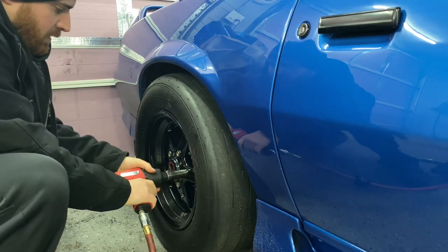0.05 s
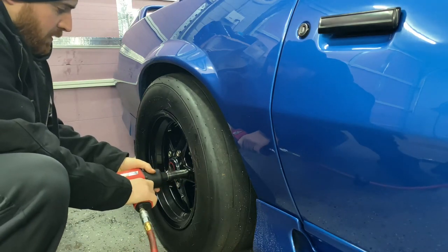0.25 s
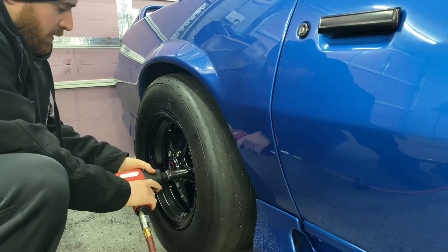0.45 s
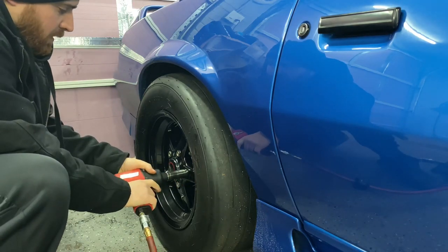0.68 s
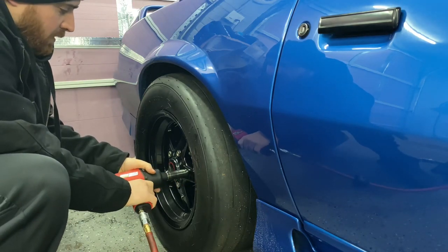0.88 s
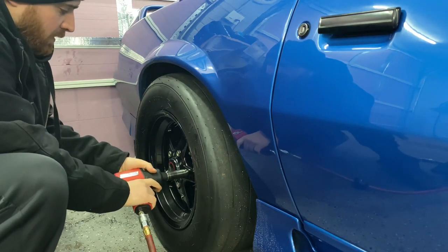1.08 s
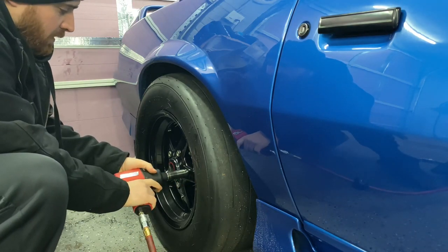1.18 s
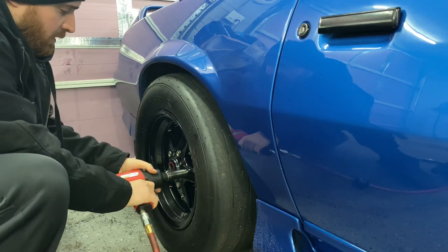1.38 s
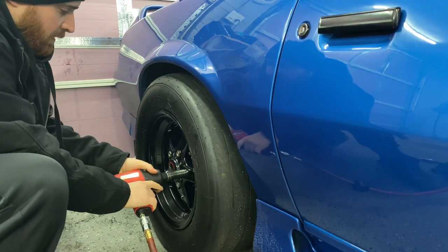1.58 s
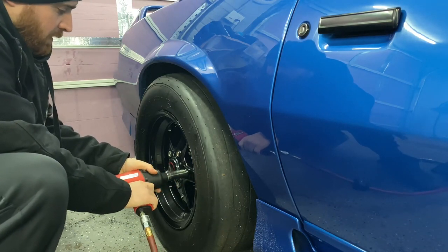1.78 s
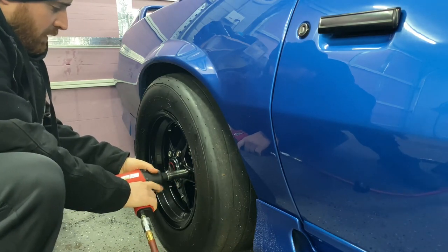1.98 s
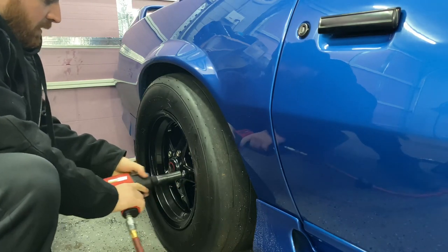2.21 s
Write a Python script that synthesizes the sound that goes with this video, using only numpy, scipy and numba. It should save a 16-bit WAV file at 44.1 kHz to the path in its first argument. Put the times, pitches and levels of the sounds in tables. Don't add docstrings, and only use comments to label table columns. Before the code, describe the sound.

A close air impact wrench is triggered four times on a wheel nut: a rising airy whirr first, then hissing bursts with sharp steel blows, small rattles between, short wall echoes and faint compressor hum, caught by phone.

```python
import sys
import numpy as np
from scipy import signal
from scipy.fft import rfft, irfft
from scipy.io import wavfile
from scipy.ndimage import uniform_filter1d, map_coordinates
from numba import njit

SR = 44100
rng = np.random.default_rng(int(sys.argv[2]) if len(sys.argv) > 2 else 0)


def undo_db(level):
    steps = np.asarray(level, float) / 20
    return 10 ** steps


def dump_mix(stems):
    frames = np.atleast_2d(stems).T
    limited = np.clip(frames, -1, 1)
    pcm = np.round(limited * 32767).astype(np.int16)
    wavfile.write(sys.argv[1], SR, pcm)


N = 99225

# frequency in Hz, level in dB.
AIR_SPECTRUM = [(150, -17), (300, -3.5), (1350, -10), (2250, -9), (4750, -6), (8000, -12), (10500, -9.5),
                (14500, -14.5)]
# frequency in Hz, level in dB.
RATTLE_SPECTRUM = [(150, -11.5), (500, 4.5), (700, -1.5), (900, 2.5), (1200, -5.5), (1700, -3.5),
                   (1900, -12), (9000, -32)]


def curve(rows, col, edge):
    r = np.array(rows, float)
    return np.interp(np.arange(N) / SR, r[:, 0], r[:, col], edge, edge)


def unit(x):
    return x / np.sqrt(np.mean(x ** 2))


def shape(x, table, low_db):
    f, r = np.fft.rfftfreq(N, 1 / SR) + 1, np.array(table, float)
    gain_db = np.interp(np.log(f), np.log(r[:, 0]), r[:, 1], low_db)
    return irfft(rfft(x) * undo_db(gain_db), N)


def colour(x, table):
    return unit(shape(x, table, -77))


def walk(rate):
    k = int(SR / rate)
    return unit(uniform_filter1d(uniform_filter1d(rng.standard_normal(N), k), k))


def wide():
    same_hz = 500
    mid, side = rng.standard_normal((2, N))
    f = np.fft.rfftfreq(N, 1 / SR)
    side = irfft(rfft(side) * f / np.hypot(f, same_hz), N)
    return np.array([mid + side, mid - side])


def motor():
    # time in seconds, vane rate in Hz, chuff level in dB.
    pull_1 = [(.233, 96, -32), (.24, 98, -19), (.262, 130, -19), (.278, 320, -21), (.296, 400, -22),
              (.325, 555, -23.5), (.357, 605, -23.5), (.403, 420, -24), (.46, 225, -38), (.52, 160, -60)]
    pull_2 = [(.8, 130, -45), (.809, 135, -17), (.822, 160, -18), (.845, 290, -27), (.885, 415, -29),
              (.915, 430, -28), (.93, 330, -34), (.97, 390, -37), (1.05, 375, -50)]
    pull_3 = [(1.303, 92.9, -33), (1.331, 153.5, -19), (1.34, 116.4, -33.5), (1.37, 157.2, -16),
              (1.382, 120, -35), (1.414, 143.2, -24.5), (1.429, 95.06, -32.5), (1.5, 78.76, -33.5),
              (1.542, 97.96, -45)]
    pull_4 = [(1.785, 80.7, -47), (1.805, 104.9, -26), (1.834, 89.9, -40), (1.858, 107.7, -27.5),
              (1.873, 92.2, -35.5), (1.895, 86.56, -29), (1.952, 95.3, -30), (2.001, 82.4, -38),
              (2.041, 94.4, -61)]
    # frequency in Hz, level in dB.
    exhaust = [(50, 8), (120, 8), (220, -6), (350, -2), (560, -6), (850, 3), (1700, -1), (2300, 4)]
    jitter, shimmer_db, order_db = .022, 3, 2.2
    rumble_db, rumble_hz = 6, 138

    pulls = pull_1, pull_2, pull_3, pull_4
    hz = sum(curve(p, 1, 0) for p in pulls) * (1 + jitter * walk(117.8))
    phase = 2 * np.pi * np.cumsum(hz) / SR
    gain = uniform_filter1d(sum(undo_db(curve(p, 2, -200)) for p in pulls), size=300)

    r = np.array(exhaust, float)
    chuff = 0
    for k in range(1, 11):
        port_db = np.interp(np.log(k * hz + 1), np.log(r[:, 0]), r[:, 1])
        level = undo_db(port_db + shimmer_db * walk(78) - order_db * k)
        chuff = chuff + level * np.cos(k * phase - 0.716 * k * k)

    rumble = colour(wide(), [(35, -30), (65, -6), (rumble_hz, 0), (260, -11), (600, -26), (2000, -60)])
    slow = 1 / (1 + (hz / 220) ** 4)
    return gain * (chuff + undo_db(rumble_db) * rumble * slow) + booms(), phase


def booms():
    # start in seconds, peak level in dB, frequency in Hz.
    openings = [
        (.237, -23, 100),
        (.803, -20, 141.2),
        (1.309, -17, 120),
        (1.792, -20, 98),
    ]
    rise_s, fall_s = 0.067, 0.037
    out = 0
    for s, db, hz in openings:
        t = np.maximum(np.arange(N) / SR - s, 0)
        swell = (1 - np.exp(-t / rise_s)) * np.exp(-t / fall_s)
        tone = np.sin(2 * np.pi * hz * t) + 0.34 * np.sin(np.pi * hz * t)
        out = out + undo_db(db + 7.5) * swell * tone
    return out


def hiss(phase):
    # time in seconds, hiss level in dB.
    air_flow = [
        [(.214, -56), (.226, -33.5), (.232, -15), (.266, -15), (.284, -16), (.32, -22.5), (.345, -16.5),
         (.395, -25.5), (.5, -44.5), (.77, -52.5)],
        [(.783, -53), (.787, -23.5), (.797, -11), (.82, -16.5), (.882, -20), (.918, -20), (.924, -27.5),
         (1.05, -36), (1.28, -51)],
        [(1.284, -48.5), (1.302, -22), (1.318, -16), (1.34, -21), (1.46, -20.5), (1.518, -29.5), (1.6, -35.5),
         (1.755, -56.5)],
        [(1.765, -49), (1.773, -40), (1.786, -26), (1.803, -20), (1.824, -20.5), (1.95, -21.5), (1.975, -25),
         (2.096, -40.5), (2.25, -59)],
    ]
    # frequency in Hz, level spared in
    # dB.
    dull_split = [(6500, 0), (12500, -35)]
    dulling, top_dulling = 0.43, .5
    flutter_db, puff_depth = 2., .25

    flow = sum(undo_db(curve(a, 1, -200)) for a in air_flow)
    air = housing(colour(wide(), AIR_SPECTRUM))
    low = shape(air, dull_split, 0)
    air = low + (air - low) * (flow / undo_db(-22.5)) ** dulling
    top = shape(air, [(12000, -60), (12600, 0)], -60)
    air = air - top * (1 - np.minimum(flow / undo_db(-18), 1) ** top_dulling)
    puffs = 1 + puff_depth * np.cos(phase)
    return flow * undo_db(flutter_db * walk(84.5)) * puffs * air


def housing(x):
    # frequency in Hz, width in Hz, lift over the hiss in dB.
    resonances = [(1837, 170, 1), (2184, 116, 4.5), (2430, 130, 4), (3575, 66, 1), (4000, 120, 0.5),
                  (4824, 117, 0), (5700, 320, 1.5)]
    f = np.fft.rfftfreq(N, 1 / SR)
    lift_db = sum(db / (1 + (2 * (f - hz) / width) ** 2) for hz, width, db in resonances)
    return unit(irfft(rfft(x) * undo_db(lift_db), N))


def hammer():
    # start in seconds, peak level in dB.
    blows = [(0.0155, -53.5), (0.7941, -8), (0.7994, -13.5), (0.8566, -9.5), (0.8835, -23), (0.904, -18),
             (0.9133, -6), (1.0885, -24), (1.259, -61), (1.3029, -16), (1.3309, -4), (1.3643, -13.5),
             (1.4167, -10), (1.4631, -8.5), (1.5222, -9.5), (1.5707, -25.5), (1.7715, -23), (1.8019, -6),
             (1.8156, -14), (1.8636, -11.5), (1.9085, -12.5), (1.954, -8.5)]
    # frequency in Hz, level in dB, 100 dB decay in seconds.
    anvil = [(830, 0, 0.027), (1180, -9, 0.022), (2090, 4, 0.024), (2570, 6, 0.044), (3670, 6, 0.06),
             (4040, 5, 0.034), (4750, 4, 0.06), (5760, 3.5, 0.035), (7050, -5, 0.06), (10260, -8, 0.05)]
    crack_s, crack_db = .005, -9
    shake_s, shake_db = 0.033, -15
    ring_db, strike_db, detune = -21, 2.5, 0.043
    contact_s = 0.00024

    out, t = np.zeros((2, N + SR)), np.arange(SR // 4) / SR
    modes = np.array(anvil, float)
    grit = np.tile(housing(colour(wide(), AIR_SPECTRUM)), 2)
    fade = undo_db(crack_db) * np.exp(-t / crack_s) + undo_db(shake_db) * np.exp(-t / shake_s)
    onset = np.minimum(t / contact_s, 1)
    for s, db in blows:
        luck = rng.standard_normal((len(modes), 3))
        hz = modes[:, :1] * (1 + detune * luck[:, :1])
        level = undo_db(modes[:, 1:2] + strike_db * luck[:, 1:2] - 100 * t / modes[:, 2:])
        ring = [(level * np.sin(2 * np.pi * hz * t + c * luck[:, 2:])).sum(0) for c in (0, 2)]
        i = int(s * SR)
        blow = fade * grit[:, i:i + len(t)] + undo_db(ring_db) * np.array(ring)
        out[:, i:i + len(t)] += undo_db(db) * onset * blow
    return out[:, :N]


def coast():
    # time in seconds, rattle level in dB.
    rattle_level = [(.405, -42), (.43, -26.5), (.55, -41), (.68, -41.5), (.76, -52.5), (.93, -79),
                    (.96, -45), (1.05, -62), (1.1, -41.5), (1.17, -53), (1.26, -68.5), (1.5, -74.5),
                    (1.55, -44.5), (1.7, -69), (1.95, -68), (2., -45), (2.15, -65), (2.25, -85)]
    knocks = wide() * undo_db(1.9 * walk(340))
    return undo_db(curve(rattle_level, 1, -200)) * colour(knocks, RATTLE_SPECTRUM)


@njit
def walls(x, lags, gain, damp):
    line, soft, out = np.zeros((8, 4096)), np.zeros(8), np.zeros((2, x.shape[1]))
    for i in range(x.shape[1]):
        total = 0.
        for k in range(8):
            soft[k] += (1 - damp) * (gain[k] * line[k, (i - lags[k]) & 4095] - soft[k])
            total += soft[k]
            out[k % 2, i] += soft[k]
        for k in range(8):
            line[k, i & 4095] = x[k % 2, i] + soft[k] - total / 4
    return out


def yard():
    # frequency in Hz, level in dB.
    hum_spectrum = [(20, -45), (40, -11), (60, 6), (110, -1), (200, -5.5), (400, -18.5), (850, -27),
                    (1200, -44.5), (5000, -50)]
    # time in seconds,
    # gain in dB.
    duck = [(0, -3.5), (.5, 0), (.75, -2.5), (1., 6.5), (1.25, -13), (1.6, 1.5), (1.75, -12.5), (2.25, -10)]
    tail_level = curve([(.012, -62), (.016, -50), (.2, -99)], 1, -200)
    tail = undo_db(tail_level) * colour(wide(), RATTLE_SPECTRUM)
    throb_db = 1.8 * walk(8.9)
    return undo_db(-45 + curve(duck, 1, 0) + throb_db) * colour(wide(), hum_spectrum) + tail


def scene():
    room_t60_s, room_db, room_damp = 0.29, -10.5, .36
    room_band_hz, chuff_wet = (122, 11500), .45
    chuff, phase = motor()
    tool = hiss(phase) + hammer() + coast()
    lags = np.array([331, 457, 613, 797, 977, 1213, 1451, 1709])
    band = signal.butter(2, room_band_hz, "band", fs=SR, output="sos")
    send = signal.sosfilt(band, tool + chuff_wet * chuff)
    echo = walls(send, lags, undo_db(-60 * lags / SR / room_t60_s), room_damp)
    return tool + chuff + undo_db(room_db) * echo + yard()


def thin(mid, side):
    mask_db, mask_from_hz = -10, 7000
    quiet_db, quiet_rise_db_khz = -118, 2.2
    f, _, z = signal.stft(np.array([mid, side]), SR, nperseg=1024)
    bands = np.abs(z[:, :512].reshape(2, 64, 8, -1)) ** 2
    band_hz = f[:512:8, None]
    level = uniform_filter1d(np.sqrt(bands.mean(axis=2)), size=2, axis=-1)
    luck = uniform_filter1d(rng.standard_normal((2, 64, bands.shape[-1])), size=5)
    level = level * undo_db(5.0 * luck)
    unmasked = level > undo_db(mask_db) * level[::-1]
    audible = level > undo_db(quiet_db + quiet_rise_db_khz * band_hz / 1000)
    keep = (unmasked & audible) | (band_hz < mask_from_hz)
    z = z[:, :513] * np.pad(np.repeat(keep, 8, axis=1), ((0, 0), (0, 1), (0, 0)))
    return signal.istft(z, SR, nperseg=1024)[1][:, :N]


def band_limit(x):
    return signal.sosfilt(signal.butter(12, 16460, fs=SR, output="sos"), x)


def record(dry):
    # frequency in Hz, level in dB.
    sum_response = [(10600, 0.5), (11150, -2), (11500, -30), (12750, -32), (13150, 3), (15000, 3),
                    (15500, -8), (15900, -40)]
    difference_response = [(9300, -6.5), (10000, -16), (10600, -13.5), (11300, 3.5), (12700, -25),
                           (13500, -36), (14300, -39), (15000, 9), (15750, 0.5), (15950, -48.5)]
    port_lag_s, left_db, ceiling, top_hz = 0.00011, 1.4, 1.05, 15900
    late = map_coordinates(dry[1], [np.arange(N) - port_lag_s * SR], mode="nearest")
    ports = np.array([dry[0] * undo_db(left_db / 2), late * undo_db(-left_db / 2)])
    left, right = ceiling * np.tanh(ports / ceiling)
    mid = shape(left + right, sum_response, 0) / 2
    side = shape(left - right, difference_response, 0)
    side = shape(side, [(60, -3.0), (200, -6.5), (500, 0.5)], -18) / 2
    mid, side = thin(mid, side)
    top_cut = signal.ellip(8, .2, 70, top_hz, fs=SR, output="sos")
    mix = signal.sosfilt(top_cut, [mid + side, mid - side])
    return band_limit(mix)


dry = scene()
out = record(dry)
dump_mix(out)
```